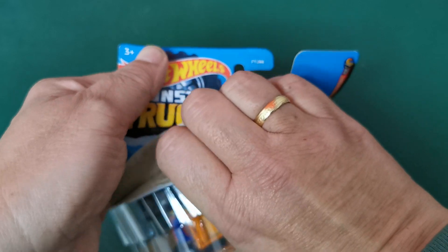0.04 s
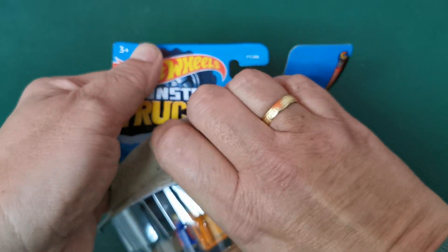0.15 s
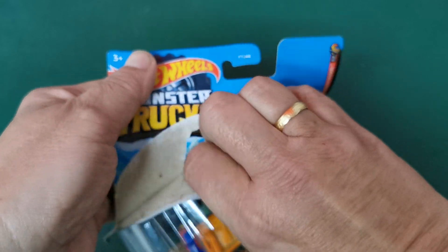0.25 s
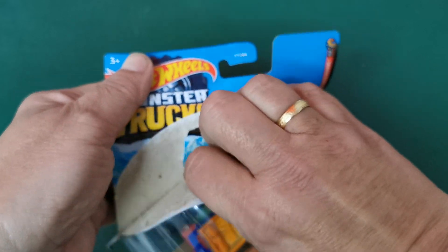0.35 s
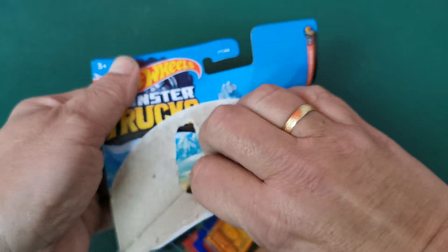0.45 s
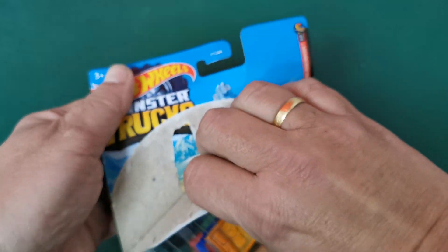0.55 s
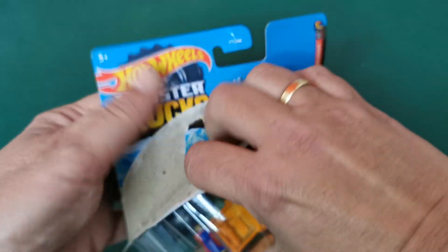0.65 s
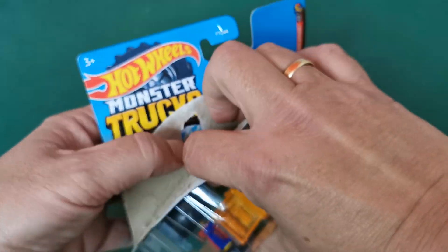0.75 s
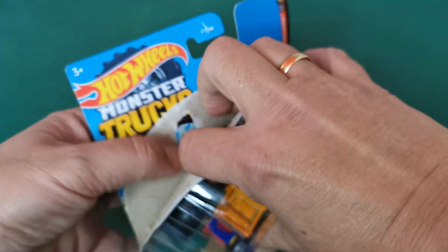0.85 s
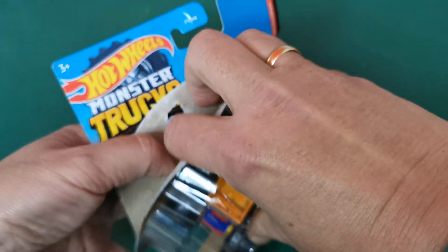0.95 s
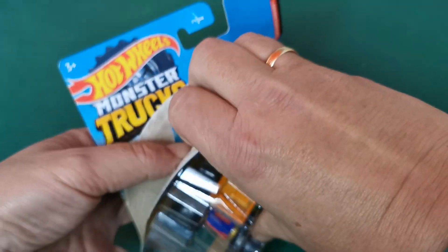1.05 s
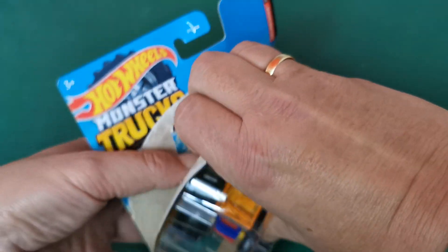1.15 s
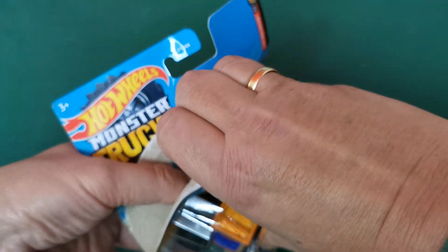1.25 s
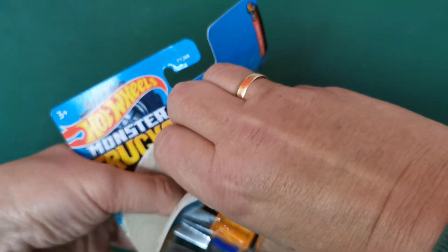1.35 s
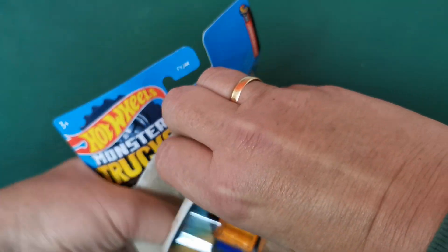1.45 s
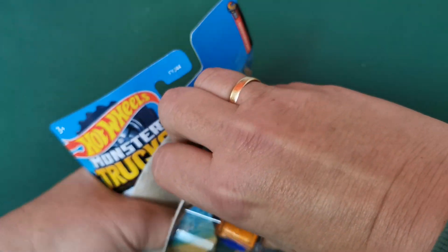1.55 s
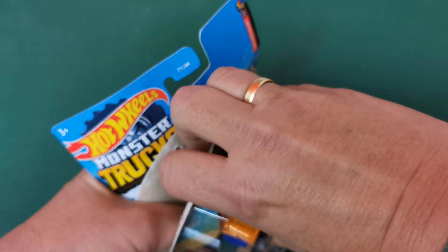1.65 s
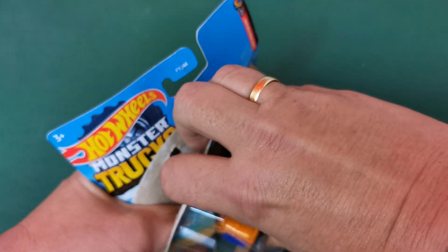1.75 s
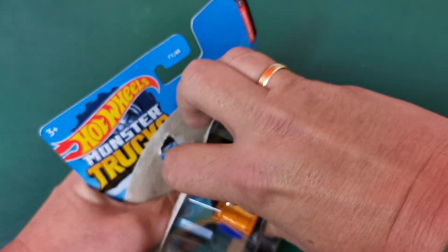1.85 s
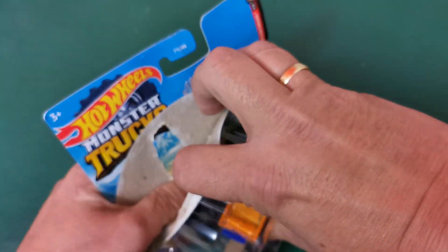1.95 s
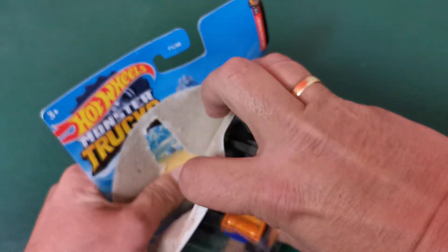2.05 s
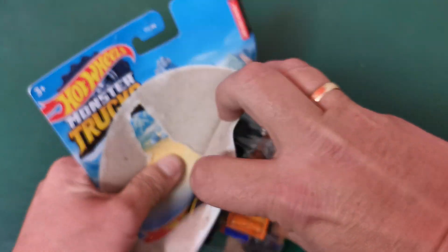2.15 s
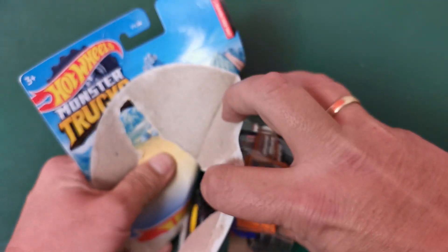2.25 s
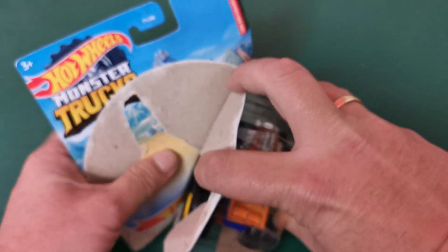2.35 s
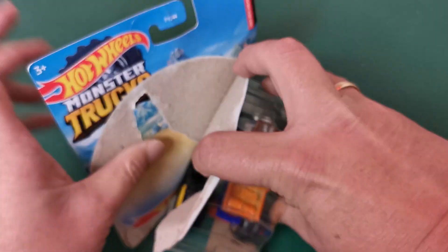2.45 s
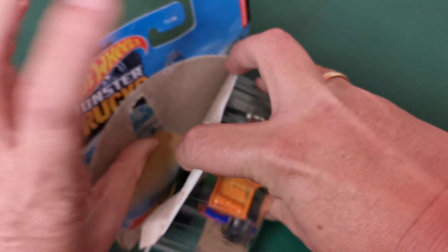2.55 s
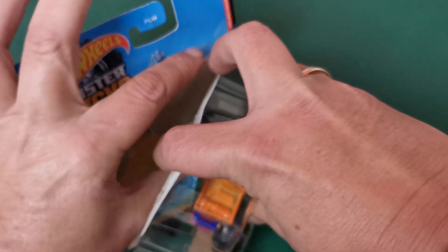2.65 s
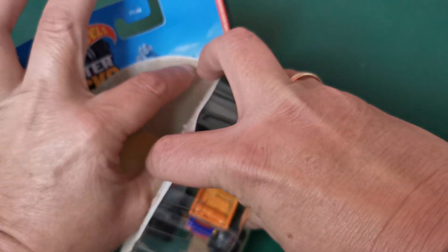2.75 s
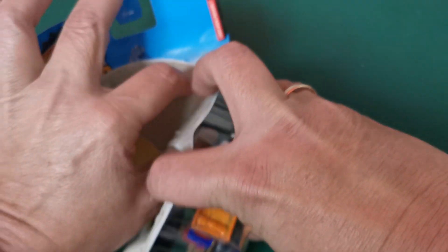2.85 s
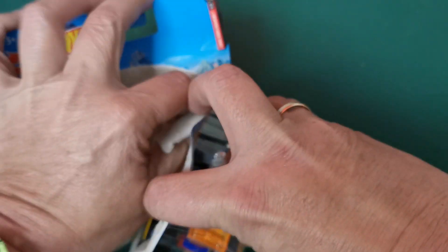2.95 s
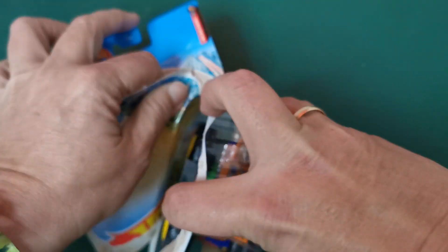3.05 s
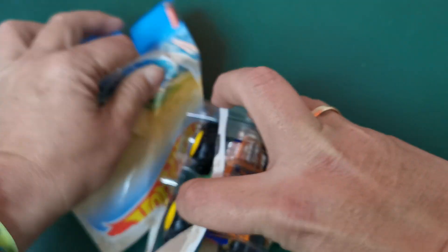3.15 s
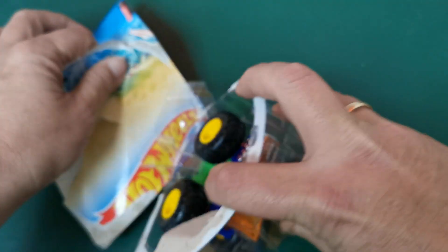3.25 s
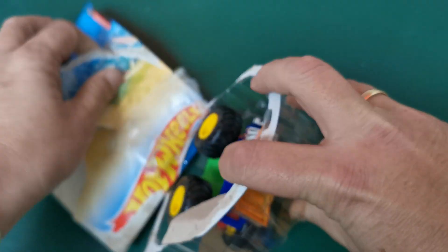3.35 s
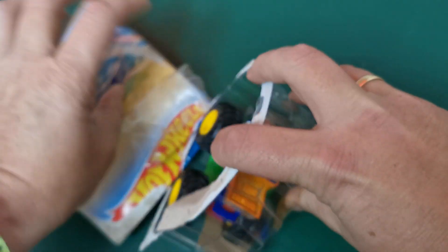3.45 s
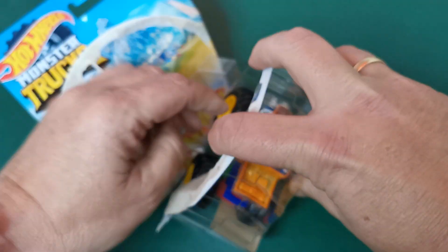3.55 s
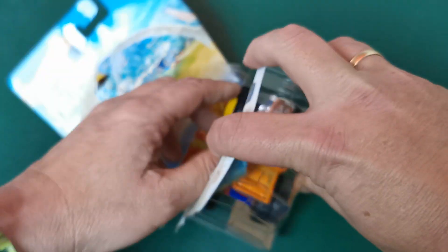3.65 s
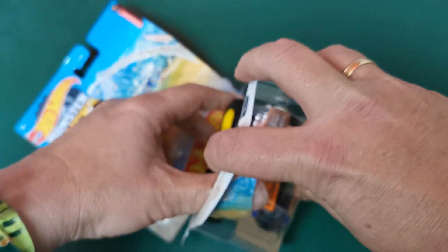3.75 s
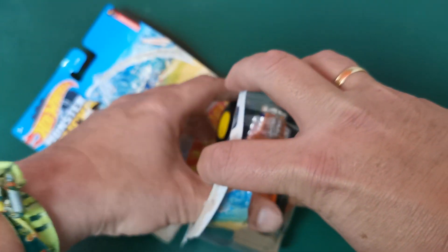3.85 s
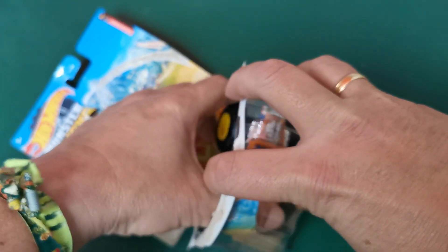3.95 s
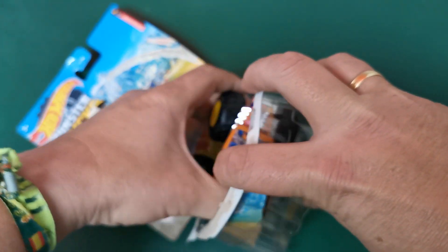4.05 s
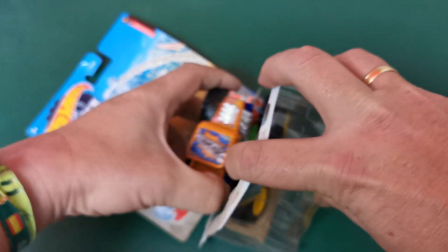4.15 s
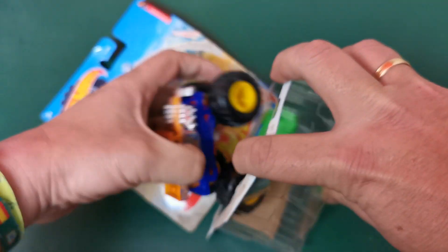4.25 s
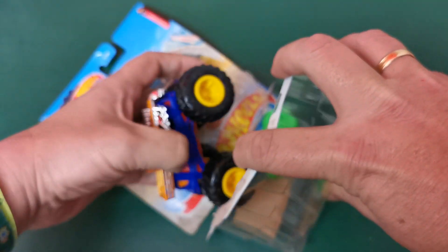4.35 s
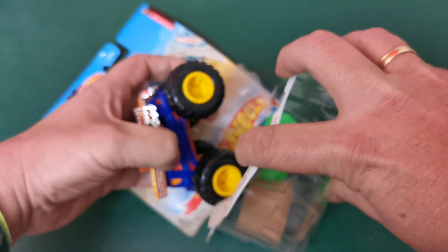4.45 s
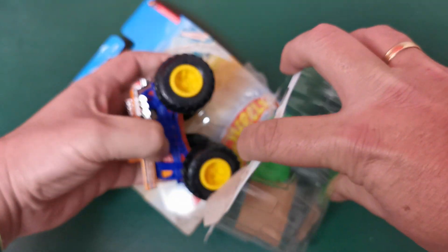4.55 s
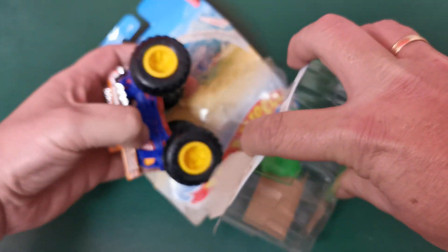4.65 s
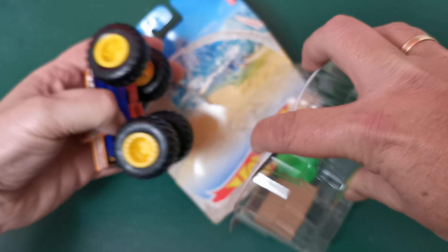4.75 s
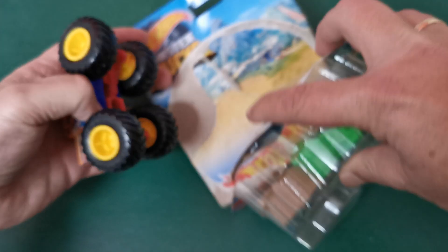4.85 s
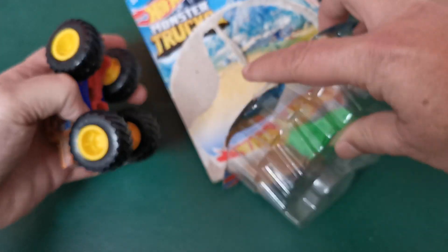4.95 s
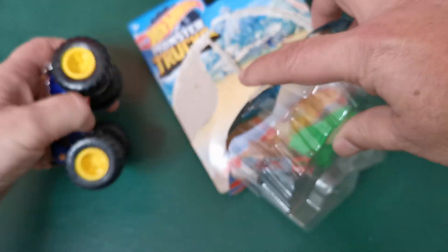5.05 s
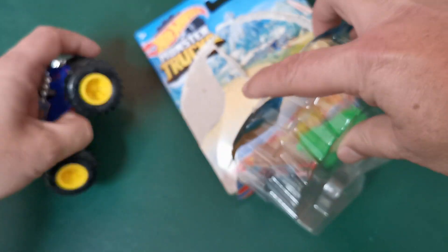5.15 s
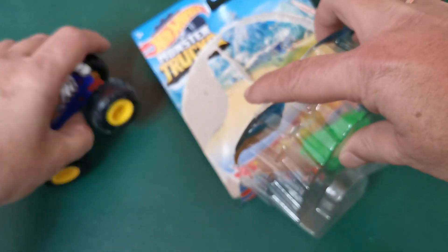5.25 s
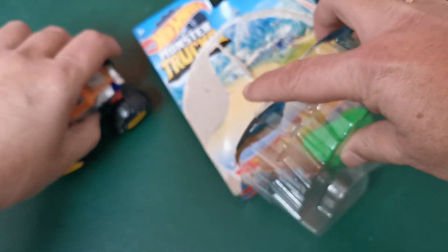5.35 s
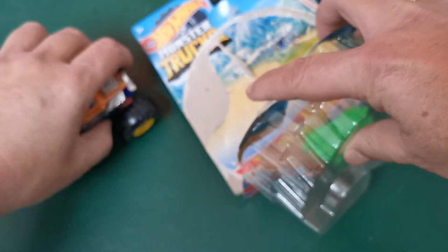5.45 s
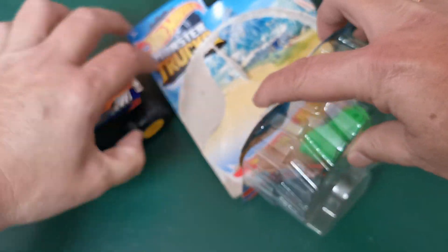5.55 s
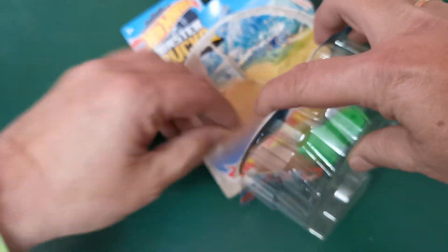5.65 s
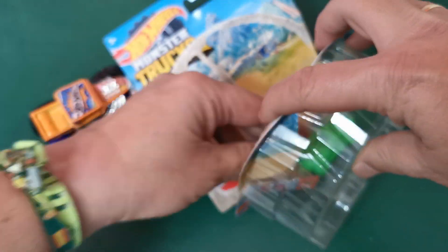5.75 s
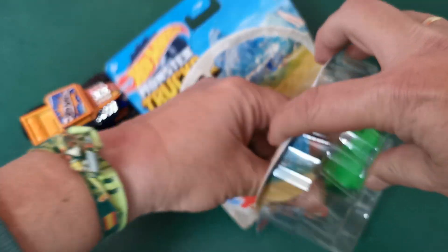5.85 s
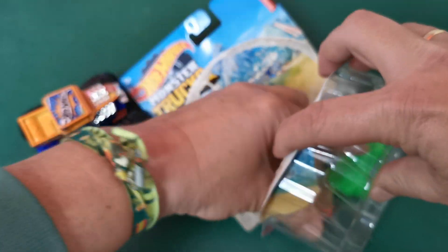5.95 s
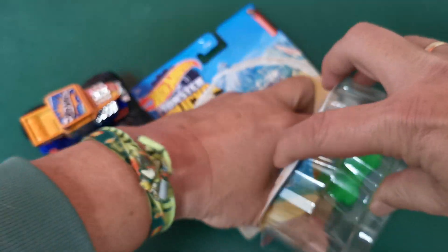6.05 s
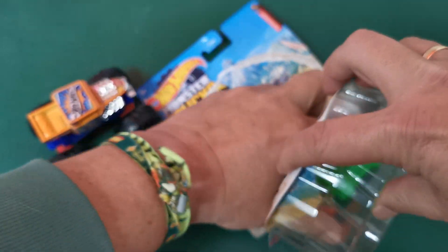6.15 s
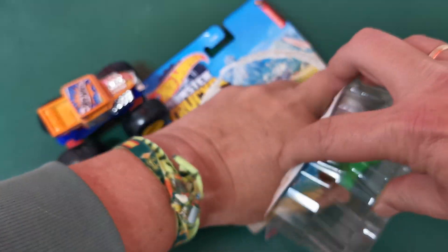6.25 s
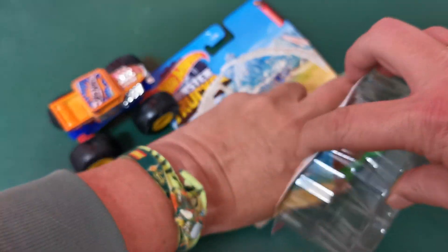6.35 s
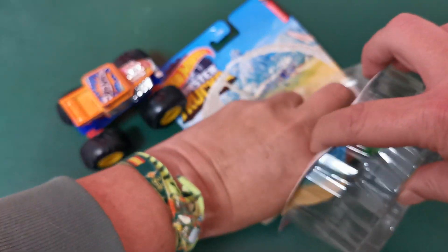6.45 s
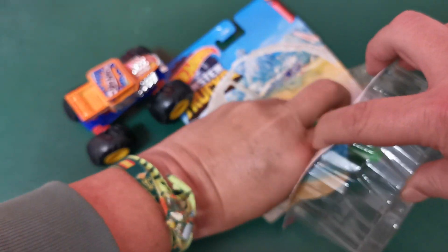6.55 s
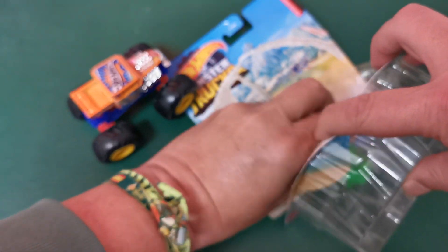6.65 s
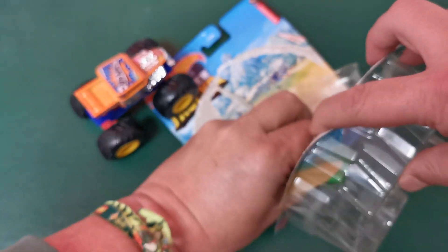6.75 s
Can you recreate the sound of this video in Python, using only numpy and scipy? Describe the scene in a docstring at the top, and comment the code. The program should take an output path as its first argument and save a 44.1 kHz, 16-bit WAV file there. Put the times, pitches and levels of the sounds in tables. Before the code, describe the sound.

Close stereo pickup of a toy package being opened on a table. Cardboard fibres rip with bright hiss and ticks while thin hard plastic buckles, pops and crackles with a short hollow ring. Handling calms, the small toy scuffs and taps down on the tabletop, then the empty shell is squeezed and crinkled again. Faint steady air behind, little echo.

```python
"""Hands pry a stiff plastic blister off its card, lift a toy out and set it on a table, close to two microphones.
The shell buckles in bursts of slips that ring panel, shell and cavity; creases rustle and crackle as random grains
through the same modes. Tearing paper fibres are filtered hiss and short bright ticks. Card and toy knock, rumble
and scuff on a table of ringing modes; feedback delays make a small quiet room, with steady air behind."""
import sys
import numpy as np
from scipy import signal
from scipy.fft import rfft, irfft
from scipy.io import wavfile

SR = 44100
rng = np.random.default_rng(int(sys.argv[2]) if len(sys.argv) > 2 else 0)


def store_wav(level_fs):
    """Save 16-bit WAV to argv[1]."""
    pcm = np.round(np.clip(np.atleast_2d(level_fs), -1, 1) * 32767)
    wavfile.write(sys.argv[1], SR, pcm.T.astype(np.int16))


N = 299527
BLOW_SAMPLES = 8192  # longest ring of one blow


def from_db(db):
    """Decibels to amplitude gain."""
    return 10 ** (np.asarray(db) / 20)


def rms_one(x):
    """Scale to rms 1."""
    return x / np.sqrt(np.mean(x ** 2) + 1e-20)


def peak_one(rows):
    """Scale each row to peak 1."""
    return rows / np.abs(rows).max(axis=1, keepdims=True)


def lowpass(x, order, cut_hz):
    """Butterworth low-pass."""
    return signal.sosfilt(signal.butter(order, cut_hz, fs=SR, output="sos"), x)


def highpass(x, order, cut_hz):
    """Butterworth high-pass."""
    return signal.sosfilt(signal.butter(order, cut_hz, "high", fs=SR, output="sos"), x)


def at_hz(points, hz):
    """Read a (Hz, value) table on a log frequency axis."""
    table_hz, values = np.array(points).T
    return np.interp(np.log(hz + 1), np.log(table_hz), values)


def at_time(points, s):
    """Read a (s, value) table, linear between points."""
    return np.interp(s, *np.transpose(points))


def drift(rate_hz):
    """Slow random wander of rms 1: noise through a double pole, on a 40-sample grid."""
    step = 40
    r = np.exp(-2 * np.pi * rate_hz * step / SR)
    noise = rng.standard_normal(N // step + 2002)
    slow = signal.lfilter([1], [1, -2 * r, r * r], noise)[2000:]  # settled part only
    return np.interp(np.arange(N) / step, np.arange(len(slow)), rms_one(slow))


def ring(x, hz, t60_s):
    """Two-pole resonator: a unit click starts a decaying sine of height 1."""
    r = from_db(-60 / (t60_s * SR))
    w = 2 * np.pi * hz / SR
    return signal.lfilter([0, np.sin(w)], [1, -2 * r * np.cos(w), r * r], x + 1e-18)


def colour(x, points):
    """Minimum-phase filter with the given spectrum, so nothing sounds early."""
    size = 4096
    spectrum_db = at_hz(points, np.fft.rfftfreq(size, 1 / SR))
    cepstrum = irfft(np.log(from_db(spectrum_db)))
    cepstrum[1:size // 2] *= 2  # fold onto positive time
    cepstrum[size // 2 + 1:] = 0
    taps = irfft(np.exp(rfft(cepstrum)), size)
    taps = taps.reshape((1,) * (x.ndim - 1) + (-1,))
    return signal.fftconvolve(x, taps, axes=-1)[..., :x.shape[-1]]


def struck(blows, modes, spread_db, held_db=0):
    """Each blow (row) excites every mode with a strength of its own; peak 1."""
    gains = from_db(held_db + spread_db * rng.standard_normal((len(blows), len(modes))))
    total = 0
    for k, (hz, db, t60_s) in enumerate(modes):
        total = total + gains[:, [k]] * from_db(db) * ring(blows, hz, t60_s)
    return peak_one(total)


# where the hands work, as mean delay of the right microphone: (time [s], delay [samples])
RIGHT_DELAYS = [(0.0, 7.1), (3.8, 7.83), (4.5, 5.2), (5.2, 9.2), (5.7, 5.9), (6.0, 2.33), (6.79, 2.14)]


def place(times_s, sounds, wander_samples):
    """Lay rows out in time; right lags left by 0 to 20 samples, scattered about the hands' position."""
    out = np.zeros((2, N + 2 * BLOW_SAMPLES))
    scatter = wander_samples * rng.standard_normal(len(times_s))
    lags = np.clip(np.round(at_time(RIGHT_DELAYS, times_s) + scatter), 0, 20).astype(int)
    for s, sound, lag in zip(times_s, sounds, lags):
        i = round(s * SR)
        out[0, i:i + BLOW_SAMPLES] += sound
        out[1, i + lag:i + lag + BLOW_SAMPLES] += sound
    return out[:, :N]


def grains(per_s, size_db, wander_samples):
    """Tiny slips of random moment, size and sign, at a wandering rate; each has its own right-side lag."""
    draw = rng.random(N)
    chance = per_s * from_db(4.0 * drift(25)) / SR
    at = np.flatnonzero(draw < chance)
    steps = np.minimum(rng.exponential(1, N), 3.6)[at]
    sizes = from_db(size_db * steps) * rng.choice([-1, 1], N)[at]
    scatter = wander_samples * rng.standard_normal(N)[at]
    lags = np.round(at_time(RIGHT_DELAYS, at / SR) + scatter).astype(int)
    out = np.zeros((2, N))
    out[0, at] = sizes
    np.add.at(out[1], np.clip(at + lags, 0, N - 1), sizes)
    return out


# the grip bends the card; cavity modes near this pitch ring most freely: (time [s], pitch [Hz])
GRIP_PITCH = [(0, 704), (0.4, 640), (1.0, 500), (1.36, 660), (1.53, 510), (1.6, 490), (1.8, 646),
              (2.0, 527), (2.15, 660), (3.2, 664), (3.33, 500), (4.4, 760), (5.7, 560), (5.82, 713),
              (6.2, 690), (6.6, 590)]
GRIP_DB_PER_OCTAVE = 10.5


def freed_db(s, modes):
    """Loss of each mode (column) at each moment (row), growing with distance from the freed pitch."""
    freed_hz = at_time(GRIP_PITCH, s)[:, None]
    return -GRIP_DB_PER_OCTAVE * np.abs(np.log2(np.array(modes)[:, 0] / freed_hz))


def rustle(slips, modes, grip_db, gripped=False):
    """Grains through the modes, each mode's level wandering on its own; rms 1."""
    s = np.arange(N) / SR
    total = 0
    for k, (hz, db, t60_s) in enumerate(modes):
        level_db = db + grip_db * drift(15.6)
        if gripped:
            level_db = level_db + freed_db(s, [[hz]])[:, 0]
        total = total + (-1) ** k * from_db(level_db) * ring(slips, hz, t60_s)
    return rms_one(total)


# air spectrum: (frequency [Hz], relative density [dB])
AIR_SPECTRUM = [(20, 6.5), (45, 8), (100, -1.5), (300, -2.5), (700, -17), (2000, -13.5), (5000, -25),
                (8000, -44), (11000, -55.5), (16000, -39)]
AIR_DB = -60.5


def room_tone():
    """Steady air noise: the bass is shared by both microphones, the treble is not."""
    mid, side = colour(rng.standard_normal((2, N)), AIR_SPECTRUM)
    side = highpass(side, 1, 400) + 0.2 * side
    return from_db(AIR_DB + 0.5 * drift(7.2)) * rms_one(np.array([mid + side, mid - side]))


ROOM_T60_S, ROOM_DB, WALL_CUT_HZ = 0.32, -21.5, 4900  # T60 at low pitch; treble dies sooner


def room(x):
    """Six feedback delays a side, duller on every round, stepped block by block."""
    out = np.zeros((2, N))
    dull = np.exp(-2 * np.pi * WALL_CUT_HZ / SR)
    lags = (rng.uniform(.012, 0.029, 12) * SR).astype(int)
    for k, lag in enumerate(lags):
        loop, state = x.copy(), [0.]
        gain = from_db(-60 * lag / SR / ROOM_T60_S)
        for i in range(lag, N, lag):
            back, state = signal.lfilter([gain * (1 - dull)], [1, -dull], loop[i - lag:i], zi=state)
            loop[i:i + lag] += back[:N - i]
        out[k % 2] += (loop - x) * (-1) ** (k // 2)  # echoes only, mixed signs
    return out


# table top modes, struck: (frequency [Hz], relative level [dB], T60 [s])
TABLE_MODES = [(59.6, -1.5, 0.13), (130, 3, 0.2), (208, 10.5, 0.044), (261, 7.5, 0.14), (363, 7.5, 0.048)]
# toy's tyres scuff along the table: (start [s], length [s], level [dB])
TYRE_SCUFFS = [(5.265, 0.13, -59.5), (5.627, 0.057, -47)]
THUMP_DB = -13  # relative to the card rustle gain


def table_rumble(card_gain):
    """Uneven drag of card and tyres, as grains through the table's modes."""
    t = np.arange(N) / SR
    scuff_gain = np.zeros(N)
    for start_s, length_s, db in TYRE_SCUFFS:
        ramp = np.minimum(t - start_s, start_s + length_s - t) / 0.027
        scuff_gain += from_db(db) * np.clip(ramp, 0, 1)
    damped = [(hz, db, t60_s / 3) for hz, db, t60_s in TABLE_MODES]  # the weight on it damps the top
    drag = rustle(grains(1100, size_db=-3, wander_samples=3.0), damped, grip_db=2)
    return (from_db(THUMP_DB) * card_gain + scuff_gain) * drag


# card and toy meet the table: (time [s], tick peak [dB], boom level [dB], boom pitch [Hz])
TABLE_KNOCKS = [(0.78, -28, -29, 99), (2.015, -29, -21.5, 262), (2.076, -38, -21.5, 186),
                (2.525, -44, -29, 150), (3.051, -26.5, -28.5, 209), (5.2686, -26.5, -38.5, 114),
                (5.4129, -23, -30.5, 125), (5.4805, -19.5, -28.5, 290), (5.6125, -22, -28, 265)]


def knocks():
    """Hard contact tick and short rattle of loose parts; the table booms, most at the pitch of the spot hit."""
    s, tick_db, boom_db, spot_hz = np.array(TABLE_KNOCKS).T[..., None]
    blows = np.zeros((len(s), BLOW_SAMPLES))
    blows[:, 0] = -1
    fading = np.exp(-np.arange(BLOW_SAMPLES) / SR / .025)
    rattle = blows + .035 * rng.standard_normal(blows.shape) * fading
    tick = ring(rattle, 520, 0.0024) + ring(rattle, 1340, 0.009)
    tick += 0.7 * ring(rattle, 2200, 0.006) + 0.33 * ring(rattle, 2700, 0.0025)
    spot = np.array([ring(row, hz, 0.028) for row, hz in zip(rattle, spot_hz[:, 0])])
    boom = peak_one(struck(rattle, TABLE_MODES, spread_db=2.5) + 2.0 * peak_one(spot))
    boom = highpass(boom, 2, 75)  # the top is too small for deep bass
    sounds = from_db(boom_db) * boom + from_db(tick_db) * peak_one(tick)
    return place(s[:, 0], sounds, wander_samples=1.0)


# tearing fibres' spectrum: (frequency [Hz], relative density [dB])
FIBRE_SPECTRUM = [(1200, -70), (2000, -24), (2800, -10.5), (4000, -5.5), (5000, -6), (7500, -16),
                  (9100, -10.5), (12000, -11), (16000, -14.5)]
# single fibres part: (time [s], peak [dB])
FIBRE_TICKS = [(0.032, -23), (0.4228, -27), (1.805, -45), (1.945, -32.5), (3.1717, -29.5), (3.249, -21.5),
               (3.3008, -19), (3.6665, -38)]
TICK_DECAY_S = 0.0029  # time constant


def ticks():
    """A fibre parts: a few milliseconds of fibre hiss with instant onset and exponential decay."""
    s, peak_db = np.array(FIBRE_TICKS).T[..., None]
    fading = np.exp(-np.arange(BLOW_SAMPLES) / SR / TICK_DECAY_S)
    burst = rng.standard_normal((len(s), BLOW_SAMPLES)) * fading
    return place(s[:, 0], from_db(peak_db) * peak_one(colour(burst, FIBRE_SPECTRUM)), wander_samples=5.5)


# moves of the hands: (peak time [s], swell [s], fade [s],
#   card and cavity rustle level [dB], shell crackle level [dB], fibre hiss level [dB])
HAND_MOVES = [(0.072, 0.17, 0.11, -39.5, -39.5, -40), (0.227, 0.053, 0.12, -45.5, -47, -42.5),
              (0.275, 0.051, 0.11, -44, -45, -40), (0.333, 0.068, 0.16, -39, -36.5, -39.5),
              (0.513, 0.13, 0.18, -37.5, -36.5, -37.5), (0.795, 0.14, 0.11, -46, -46.5, -52),
              (1.006, 0.029, 0.027, -29.5, -36, -43.5), (1.095, 0.11, 0.14, -41, -44, -48),
              (1.311, 0.18, 0.096, -40, -47, -52.5), (1.429, 0.015, 0.066, -34.5, -45, -61),
              (1.539, 0.012, 0.13, -28.5, -33.5, -36.5), (1.81, 0.24, 0.75, -44, -56, -89),
              (2.021, 0.086, 0.22, -38, -45, -44.5), (2.1, 0.13, 0.25, -42.5, -46.5, -42.5),
              (2.161, 0.017, 0.053, -28, -22, -40), (2.299, 0.18, 0.07, -36.5, -35, -35.5),
              (2.349, 0.12, 0.03, -35.5, -48, -54), (2.46, 0.074, 0.097, -49.5, -47.5, -55),
              (2.59, 0.12, 0.03, -52, -44, -55.5), (2.711, 0.064, 0.055, -58, -54, -60),
              (2.818, 0.085, 0.09, -43, -50, -58.5), (2.992, 0.018, 0.31, -42.5, -44, -47),
              (3.04, 0.086, 0.19, -30.5, -41.5, -53), (3.1, 0.035, 0.084, -43, -32.5, -38),
              (3.21, 0.16, 0.086, -48.5, -37, -39.5), (3.317, 0.11, 0.22, -34, -31, -45.5),
              (3.478, 0.095, 0.1, -45, -39, -49.5), (3.671, 0.01, 0.05, -35.5, -29, -40),
              (3.749, 0.2, 0.056, -39, -36, -52.5), (3.871, 0.32, 0.074, -40, -40, -59),
              (4.159, 0.09, 0.18, -37.5, -42, -55.5), (4.224, 0.061, 0.05, -42, -32, -46.5),
              (4.371, 0.044, 0.065, -34.5, -36.5, -57.5), (4.474, 0.068, 0.043, -38.5, -51, -62),
              (4.52, 0.007, 0.04, -32.5, -48, -57), (4.697, 0.0051, 0.059, -68, -40.5, -77),
              (4.777, 0.074, 0.094, -34.5, -35.5, -49.5), (5.01, 0.079, 0.082, -43, -46.5, -75),
              (5.19, 0.08, 0.13, -52.5, -52, -86), (5.31, 0.06, 0.14, -52, -51, -85),
              (5.413, 0.0026, 0.023, -39, -34, -63), (5.49, .008, 0.029, -57, -39, -52),
              (5.616, 0.0062, 0.033, -44.5, -43, -62), (5.715, 0.006, 0.14, -41.5, -48.5, -76),
              (5.896, 0.052, 0.066, -36, -35.5, -46), (5.96, 0.094, 0.31, -40.5, -44, -54.5),
              (6.139, 0.046, 0.049, -33, -35.5, -39), (6.242, 0.059, 0.057, -61, -36, -40),
              (6.316, 0.033, 0.039, -35.5, -33, -40.5), (6.354, 0.03, 0.12, -39, -33, -46.5),
              (6.547, 0.031, 0.063, -38.5, -34, -41), (6.62, 0.051, 0.15, -45, -41, -50),
              (6.734, 0.017, 0.046, -41, -39, -52), (6.785, 0.029, 0.14, -37.5, -31.5, -45.5)]
SWELL_DB = 20  # rise over one swell time, fall over one fade time
MOVE_SHAPE = 0.83  # exponent; under 1: pointed peak, long tails


def moves():
    """Gains of rustle, crackle and hiss: each move climbs and sinks; overlapping moves add in power."""
    peak_s, swell_s, fade_s, card_db, shell_db, fibre_db = np.array(HAND_MOVES).T[..., None]
    t = np.arange(0, N + 64, 64) / SR
    before = (peak_s - t) / np.maximum(swell_s, .003)
    after = (t - peak_s) / np.maximum(fade_s, .003)
    below_db = -SWELL_DB * np.maximum(before, after) ** MOVE_SHAPE
    gains = []
    for db in (card_db, shell_db, fibre_db):
        power = np.sum(from_db(db + below_db) ** 2, axis=0)
        gains.append(np.interp(np.arange(N) / SR, t, np.sqrt(power)))
    return gains


# card and air cavity modes of the blister: (frequency [Hz], relative level [dB], T60 [s])
CAVITY_MODES = [(241, -10, 0.11), (378, -6.5, 0.095), (440, 0.5, 0.0051), (517, -8, 0.054),
                (561.4, -2, 0.026), (673.6, 4, 0.021), (692.6, 4, 0.022), (771, 1, 0.02),
                (905, 2.5, 0.0053)]
# stiff shell modes: (frequency [Hz], relative level [dB], T60 [s])
SHELL_MODES = [(1148, -11, 0.037), (1227, -7, 0.042), (1716, 3, 0.0073), (2040, 1.5, 0.019),
               (2345, 9, 0.0059), (2967, -7.5, 0.02), (2950, -9.5, 0.0072), (4170, -12, 0.0051),
               (1440, 0.5, 0.0055), (3740, 5, 0.00087)]
HISS_FLOOR_DB = -74  # hiss never quite stops


def handling(card_gain, shell_gain, fibre_gain):
    """Shared creases excite card and shell and feed the fibre hiss, whose treble flickers on its own."""
    creases = grains(1800, size_db=3.6, wander_samples=3.5)
    fibres = grains(6000, size_db=1.5, wander_samples=4.1)
    hiss = rms_one(colour(fibres + 0.36 * creases, FIBRE_SPECTRUM))
    hiss = hiss + (from_db(1.67 * drift(11.0)) - 1) * highpass(hiss, 1, 7000)
    card_rustle = card_gain * rustle(creases, CAVITY_MODES, grip_db=4.5, gripped=True)
    shell_crackle = shell_gain * rustle(creases, SHELL_MODES, grip_db=3.5)
    return card_rustle + shell_crackle + (fibre_gain + from_db(HISS_FLOOR_DB)) * hiss


# shell buckles: (time [s], cavity ring level [dB], panel pitch [Hz], panel level [dB],
#   slip decay time constant [s], clipped when played)
SHELL_SNAPS = [(0.033, -26.5, 1580, -25.5, 0.0073), (0.061, -23, 1278, -13.5, 0.0033),
               (0.116, -27.5, 1410, -36, 0.0065), (0.228, -32, 1430, -30.5, 0.0026),
               (0.236, -27, 1290, -50, 0.0066), (0.315, -33.5, 1750, -32, 0.014),
               (0.363, -20.5, 1640, -22, 0.0047), (0.407, -30, 2030, -33, 0.004),
               (0.502, -45, 1670, -28, 0.064), (0.602, -31, 990, -48, 0.0044),
               (0.632, -32.5, 1070, -67, 0.0034), (0.673, -34, 1710, -31.5, 0.0055),
               (1.008, -25, 1520, -31, 0.0058), (1.223, -30.5, 2420, -34.5, 0.011),
               (1.294, -41, 1056, -31.5, 0.025), (1.3636, -24, 1490, -44, 0.0023),
               (1.4204, -29, 2720, -27, 0.0033), (1.5275, -39, 4050, -13, 0.0056),
               (1.5286, -7, 1160, -14, 0.0078), (1.544, -25, 4240, -26, 0.006),
               (1.588, -19.5, 1250, -20, 0.0095), (1.806, -29.5, 1610, -31, 0.0076),
               (1.815, -21.5, 960, -29.5, 0.013), (1.944, -29, 1680, -30.5, 0.026),
               (2.009, -19, 1600, -29, 0.016), (2.154, -1.5, 1260, -11, 0.0055),
               (2.157, -38, 1780, -5, 0.0043), (2.185, -20, 1700, -35, 0.0076),
               (2.288, -26.5, 1160, -33, 0.026), (3.024, -34, 1320, -23.5, 0.024),
               (3.056, -23.5, 1360, -22, 0.0071), (3.067, -22, 1370, -13, 0.0016),
               (3.09, -25, 1070, -9.5, 0.0087), (3.156, -23, 1290, -23, 0.0036),
               (3.248, -22.5, 1560, -9.5, 0.012), (3.302, -51, 1970, -16.5, 0.015),
               (3.326, -28, 1870, -15, 0.01), (3.441, -32, 1350, -32, 0.02),
               (3.467, -34, 1690, -24.5, 0.015), (3.67, -46.5, 1420, -23.5, 0.0087),
               (3.815, -30, 1130, -28, 0.0078), (4.205, -35.5, 1510, -32.5, 0.022),
               (4.234, -31, 2510, -32, 0.017), (4.371, -43.5, 1240, -32, 0.02),
               (4.515, -35, 1330, -28.5, 0.0024), (4.6945, -67, 2200, -25.5, 0.0055),
               (4.738, -34, 900, -29.5, 0.0018), (4.79, -39, 870, -26.5, 0.0017),
               (4.963, -53, 1810, -35, 0.006), (4.986, -45, 2600, -36, 0.0038),
               (5.141, -67, 2210, -41, 0.011), (5.179, -53, 2030, -33.5, 0.0076),
               (5.238, -48, 2100, -42, 0.004), (5.706, -30.5, 1210, -38, 0.0084),
               (5.8135, -30, 1160, -32.5, 0.013), (5.858, -28, 1520, -30.5, 0.0052),
               (5.888, -28.5, 2080, -28.5, 0.012), (5.897, -23, 2100, -34, 0.0052),
               (5.929, -27, 2320, -25.5, 0.023), (6.108, -24, 1520, -37, 0.0081),
               (6.131, -29, 2750, -21, 0.032), (6.2185, -57, 2020, -28, 0.005),
               (6.253, -39, 1890, -21.5, 0.006), (6.347, -43, 1790, -19, 0.017),
               (6.385, -28, 1900, -32, 0.011), (6.434, -60, 2260, -23.5, 0.0091),
               (6.463, -56, 2200, -29.5, 0.0072), (6.507, -47, 1400, -33, 0.0082),
               (6.546, -35, 1720, -24.5, 0.011), (6.601, -33.5, 2130, -25, 0.017),
               (6.612, -31.5, 1500, -35, 0.0046), (6.686, -53, 1770, -31.5, 0.0069),
               (6.728, -41, 1350, -21, 0.0016), (6.789, -19, 915, -10, 0.0075)]
CRACK_DB, CRACK_PER_FIBRE_DB = -9, 0.31  # crack re panel; dB per dB of fibre hiss over shell crackle


def snaps():
    """A panel flips in a dying burst of slips; cavity, shell and panel ring, a noise crack tops it."""
    s, cavity_db, panel_hz, panel_db, slip_s = np.array(SHELL_SNAPS).T[..., None]
    move_s, *_, shell_db, fibre_db = np.transpose(HAND_MOVES)
    tearing_db = np.interp(s, move_s, fibre_db - shell_db)
    crack_db = panel_db + CRACK_DB + CRACK_PER_FIBRE_DB * tearing_db
    shape = (len(s), BLOW_SAMPLES)
    fading = np.exp(-np.arange(BLOW_SAMPLES) / SR / np.clip(slip_s, .0005, .05))
    slips = np.clip(rng.standard_normal(shape) ** 3, -15, 15) * fading  # few large among many small
    slips[:, :2] = 16.0  # the first release is the largest
    slips = lowpass(slips, 1, 4000)  # a slip takes a moment
    panel = peak_one(np.array([ring(row, hz, 25.0 / hz) for row, hz in zip(slips, panel_hz[:, 0])]))
    shell = peak_one(struck(slips, SHELL_MODES, spread_db=8.0) + 1.76 * panel)
    noise = signal.lfilter([1], [1, -.4], rng.standard_normal(shape) * fading)  # duller than the fibres
    crack = peak_one(colour(noise, FIBRE_SPECTRUM))
    cavity = struck(slips, CAVITY_MODES, spread_db=4.5, held_db=freed_db(s[:, 0], CAVITY_MODES))
    sounds = from_db(cavity_db) * cavity + from_db(panel_db) * shell + from_db(crack_db) * crack
    return place(s[:, 0], sounds, wander_samples=1.5)


# treble leans left or right as the blister turns: (time [s], left minus right [dB])
TREBLE_BALANCE = [(0, -1.5), (1.0, 5.5), (1.8, 0.5), (3.648, 4), (5.3, -1.5), (5.7, 2.5), (6.79, 2.5)]
SHEET_CUT_HZ = 228.6  # the blister's sounds carry no bass below this


def scene():
    """Blister and table sounds, their echo and the air."""
    gains = moves()
    blister = highpass(handling(*gains) + snaps() + ticks(), 4, SHEET_CUT_HZ)
    near = blister + knocks() + table_rumble(gains[0])
    lean_db = at_time(TREBLE_BALANCE, np.arange(N) / SR) * [[.5], [-.5]]
    near = near + (from_db(lean_db) - 1) * highpass(near, 1, 4000)
    return near + from_db(ROOM_DB) * room(near.mean(axis=0)) + room_tone()


# microphone pair colour: (frequency [Hz], left minus right [dB])
MIC_BALANCE = [(60, 0.7), (160, 0.7), (270, -1.5), (450, -7.5), (740, -9.5), (1220, -4.5), (2010, -6.0),
               (3330, -3.5), (5500, -0.5), (9080, 1.0), (15000, -7.0)]
CEILING, CUTOFF_HZ = .96, 16500


def record(dry):
    """The microphones differ in colour; peaks are rounded under a ceiling, then the top is cut."""
    sides = []
    for x, sign in zip(dry, (1, -1)):
        sides.append(colour(x, [(hz, sign * db / 2) for hz, db in MIC_BALANCE]))
    sides = np.array(sides)
    rounded = sides / (1 + (sides / CEILING) ** 8) ** .125
    return signal.sosfilt(signal.cheby2(18, 75, CUTOFF_HZ, fs=SR, output="sos"), rounded)


dry = scene()
out = record(dry)
store_wav(out)
```